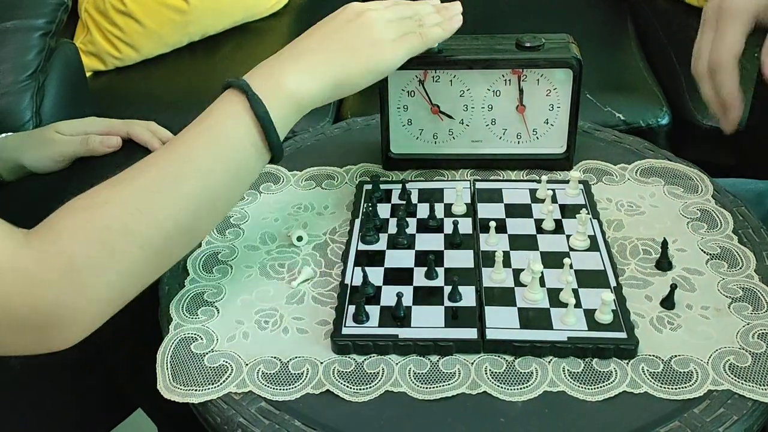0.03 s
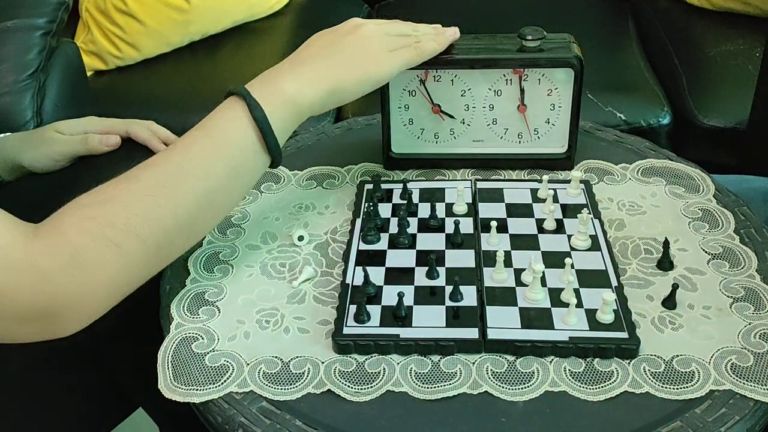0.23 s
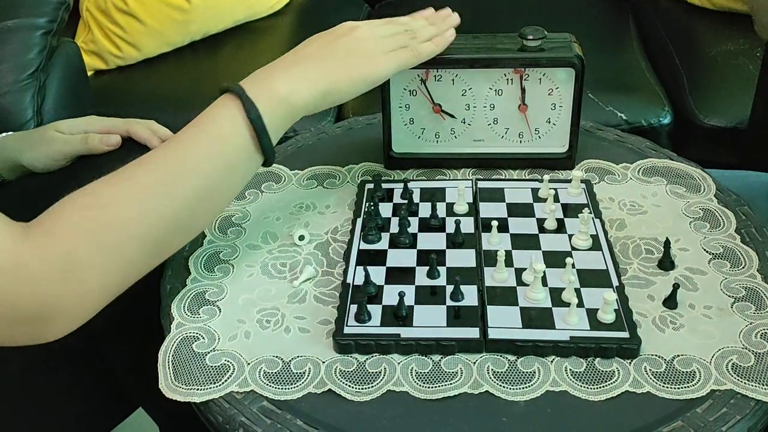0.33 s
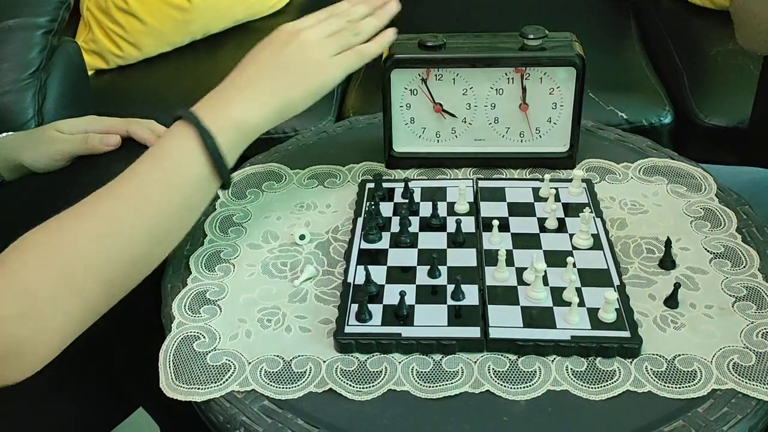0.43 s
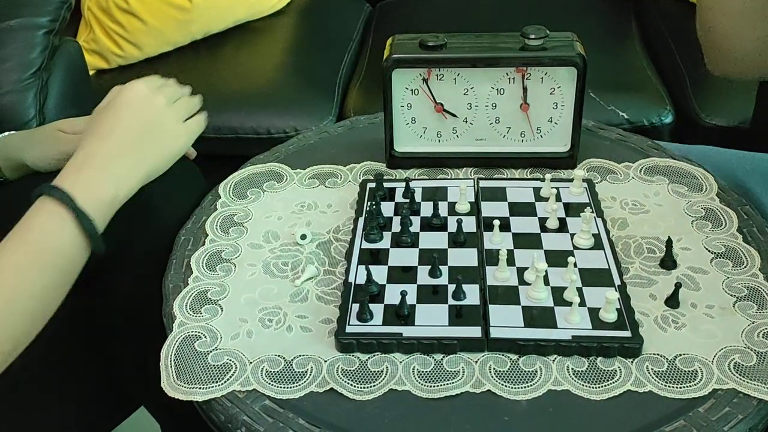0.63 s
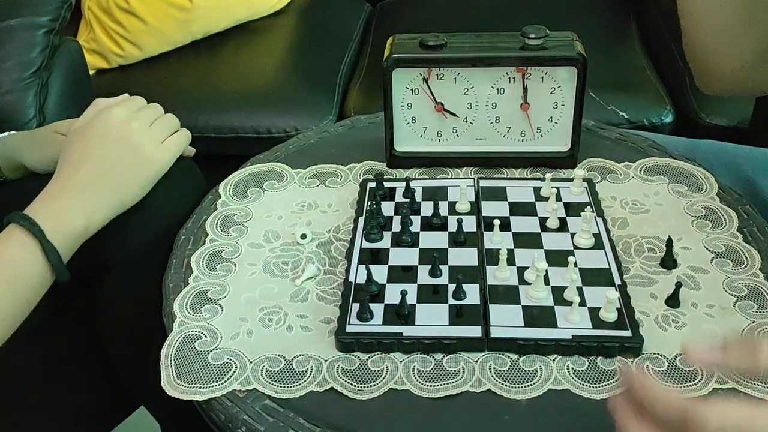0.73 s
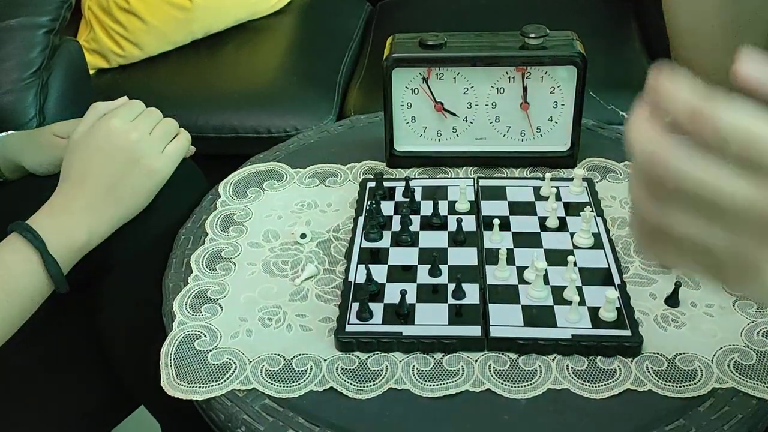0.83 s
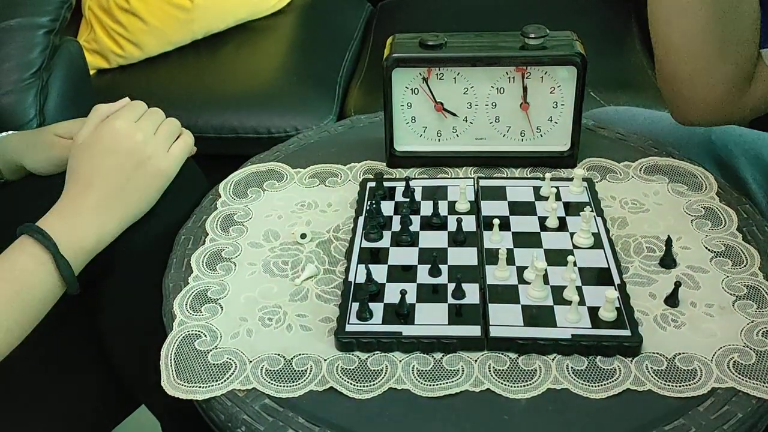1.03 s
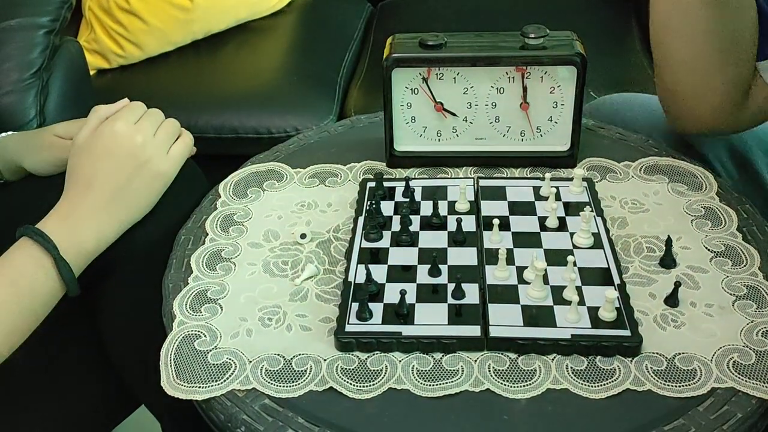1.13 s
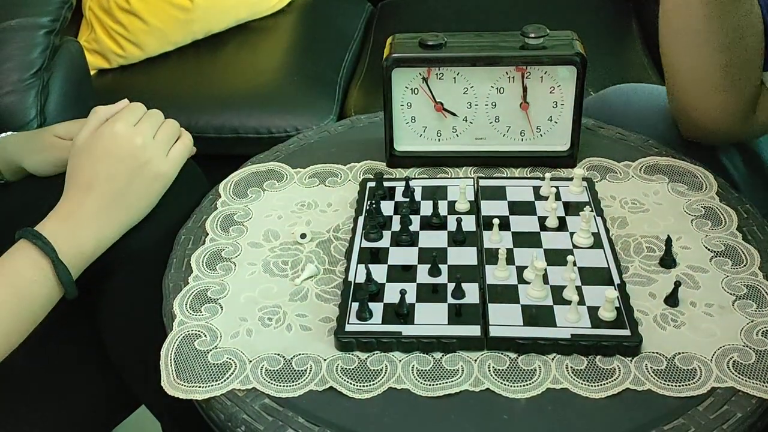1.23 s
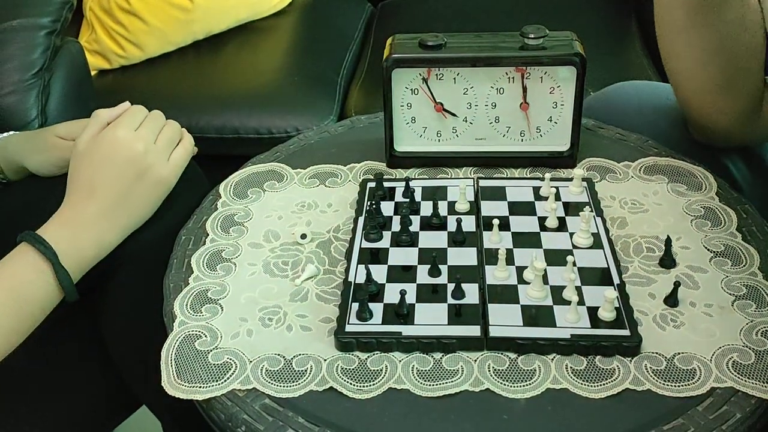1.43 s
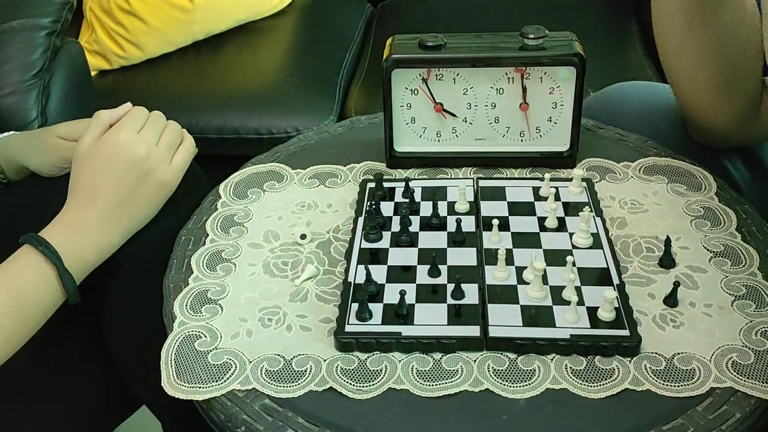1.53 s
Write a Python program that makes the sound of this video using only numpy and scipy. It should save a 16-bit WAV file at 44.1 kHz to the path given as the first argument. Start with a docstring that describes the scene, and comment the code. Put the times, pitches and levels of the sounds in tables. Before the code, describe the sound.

A mechanical chess clock button is pressed with a quick, hard double click that knocks the table, followed by a tiny scrape with ticks and soft thuds, close stereo microphone, small hissy room.

```python
"""Chess clock button on a table

Close on a mechanical chess clock in a small furnished room, through a microphone with two ports.
The plastic button rattles in twice, the second time hard: contacts ring case and works, shoves ring the table.
Later grains of friction and ticks, through broad resonances, make something small slide on the cloth;
decaying low tones make soft thuds through the table. Shaped noise makes the steady hiss, a low rustle
that comes and goes, and the decaying answer of the room."""
import sys
import numpy as np
from scipy import signal
from scipy.fft import rfft, irfft, next_fast_len
from scipy.io import wavfile
from scipy.ndimage import uniform_filter1d

SR = 44100
rng = np.random.default_rng(int(sys.argv[2]) if len(sys.argv) > 2 else 0)


def invert_db(x):
    """Field ratio 10**(x/20) for x, a level in decibels (scalar or array-like)."""
    u = np.asarray(x, float) / 20
    return 10 ** u


def dump(signal):
    """Clip the signal to [-1, 1] and save it as 16-bit WAV at the path in sys.argv[1]."""
    limited = np.clip(np.atleast_2d(signal).T, -1, 1)
    pcm = np.round(limited * 32767).astype(np.int16)
    wavfile.write(sys.argv[1], SR, pcm)


N = 70560  # samples, 1.6 s

# Levels of single sounds are those at the source, ahead of panning and low cut; colours are relative.
# steady hiss: (frequency [Hz], density [dB per Hz])
HISS_COLOUR = [(15, -50), (30, -12), (55, -4), (90, -10.5), (190, -5.5), (300, -8), (600, -9), (1200, -6),
               (1700, -5), (2250, -1.5), (2700, -6), (3150, -9.5), (4000, -9), (5400, -10.5), (6300, -17.5),
               (8000, -29.5), (12000, -34.5), (15000, -42), (16000, -55)]
# low rustle that comes and goes: (time [s], level [dB])
RUSTLE_LEVEL = [(0, -63.5), (.3, -48.5), (.7, -61), (.85, -49.5), (1.0, -64.5), (1.12, -53.5), (1.25, -50),
                (1.36, -55), (1.5, -50), (1.6, -50.5)]
# its colour: (frequency [Hz], density [dB per Hz])
RUSTLE_COLOUR = [(150, -13), (300, -12.5), (600, 1.5), (850, -4.5), (1400, -42.5)]
# left-right likeness of diffuse sound: (frequency [Hz], correlation [0-1])
ALIKE = [(30, .8), (120, 0.9), (400, 0.8), (1000, 0.23), (2500, 0), (6000, 0)]
# contacts of the button works: (time [s], drive of the low case [dB], drive of the bright works [dB])
CONTACTS = [(.2328, -19, -36), (0.2342, -20.5, -24.5), (.2362, -25, -26.5), (.2384, -13.5, -26.5),
            (0.2407, -21, -20), (.243, -42, -34), (0.2503, -33, -33), (.261, -31, -29.5),
            (0.28, -24.5, -32.5), (.283, -26, -32), (.285, -21, -53), (0.2859, -19.5, -20),
            (.2879, -17.5, -13.5), (0.2888, -13.5, -12.5), (0.2901, -10.5, -10.5), (0.2911, -13.5, -9.5),
            (0.2933, -24.5, -15), (0.2953, -33, -23.5), (0.2987, -31.5, -19), (.3012, -25, -27.5),
            (.304, -16, -20.5)]
# modes of the hollow case, before scatter: (frequency [Hz], level [dB], t60 [s])
CASE_MODES = [(679, -2, 0.03), (835, -4.5, 0.027), (974, 5, 0.011), (1105, -7, 0.021), (1270, -2, 0.016)]
# modes of lever and button, before scatter: (frequency [Hz], level [dB], t60 [s])
WORKS_MODES = [(1665, 2.5, 0.013), (2060, 0.5, 0.027), (2130, -23, 0.025), (2270, 6, 0.0079),
               (3200, -19, 0.0058), (3960, -1.5, .012), (4316, 8, 0.01), (5075, 0, 0.027),
               (5600, -27, 0.0059), (7240, -7, 0.017), (12400, -22, 0.012)]
# colour of the crack of a contact: (frequency [Hz], density [dB per Hz])
CRACK_COLOUR = [(300, -45), (1200, -9.5), (5500, 6.5), (7000, -12.5), (12000, -12.5), (15000, -24)]
# shoves that the presses give the table: (time [s], level [dB])
SHOVES = [(.2355, -26), (0.2874, -14.5), (0.321, -27.5), (0.348, -32.5)]
# modes of the table, before scatter: (frequency [Hz], level [dB], t60 [s])
TABLE_MODES = [(92, -25, 0.3), (144, 4.5, 0.06), (249, 1.5, 0.053), (563, -3, 0.1), (1108.6, -13.5, 0.13)]
# decay of the room: (frequency [Hz], t60 [s])
ROOM_DECAY = [(100, 0.47), (500, 0.38), (2000, 0.53), (5000, 0.46), (10000, 0.57)]
# colour of the room's answer: (frequency [Hz], level [dB])
ROOM_COLOUR = [(100, -8), (250, -1), (600, -3.5), (1100, 1), (2100, -5.5), (3000, 5.5), (4300, -2),
               (6500, 1.5), (12000, -5.5)]
# the slide on the cloth: (time [s], level [dB])
SLIDE = [(.79, -66), (.822, -50), (.832, -41), (.84, -42), (.846, -38), (.853, -41), (.862, -44),
         (.875, -45), (.89, -49), (.93, -66)]
# small ticks: (time [s], peak level [dB])
TICKS = [(.8432, -30), (.8452, -29), (.8512, -23)]
# what slides and ticks rings with: (frequency [Hz], width [Hz], level [dB])
PIECE_MODES = [(1640, 370, 6), (2040, 390, 6.5), (3360, 350, -2.5), (3700, 380, 0.5), (5100, 300, -1.5),
               (7600, 460, -17), (14400, 4500, -24.5)]
# soft thuds: (time [s], level [dB], frequency [Hz], t60 [s])
THUDS = [(.8, -36.5, 224, 0.073), (.8, -35, 470, 0.052), (.81, -36.5, 80, 0.22), (0.85, -32.5, 174, 0.05),
         (0.864, -33.5, 73.9, 0.25), (0.901, -41, 73.1, 0.16), (1.072, -36.5, 192, 0.044),
         (1.2, -41, 105, 0.16), (1.268, -39, 354, 0.085), (1.284, -37, 84, 0.18), (1.32, -39, 181, 0.078)]

HISS_DB = -43.5
PORT_LAG_S = 0.0002  # left port later than right, diffuse sound
CASE_RISE_S, CASE_SCATTER_DB, CASE_DETUNE = 0.0003, 1.5, 0.02  # detuning as a fraction of frequency
WORKS_RISE_S, WORKS_SCATTER_DB, WORKS_DETUNE = 0.00015, 1.5, 0.06
OWN_SHARE = 0.94  # part of the bright ringing's power that each port hears on its own
WORKS_PAN_DB, WORKS_LAG_S = -0.3, 0.00008  # added left, taken off right; left later
CRACK_DB, CRACK_T60_S = 3.5, 0.0055  # above the works drive, before colouring
SHOVE_RISE_S, SHOVE_SCATTER_DB = 0.004, 0.76
ROOM_DB, ROOM_DELAY_S = -4.5, 0.004
SLIDE_GRAINS_PER_S, SLIDE_PAN_DB = 2600, -4  # added left, taken off right
THUD_RISE_S = 0.0036
LOW_CUT_HZ, TOP_HZ = 68, 15800
SQUASH_TOP, SQUASH_HARD = 0.9, 4  # ceiling at full scale 1; sharpness of the bend


def unit(x):
    """Scale to rms 1."""
    return x / np.sqrt(np.mean(x ** 2) + 1e-20)


def along(points, hz):
    """Read (frequency, value) points on a log frequency axis."""
    f, value = np.transpose(points)
    return np.interp(np.log(hz + 1), np.log(f + 1), value)


def level(rows):
    """Gain per sample from (time, dB) rows."""
    s, db = np.transpose(rows)
    return invert_db(np.interp(np.arange(N) / SR, s, db))


def filtered(x, response):
    """Multiply the spectrum of x by a complex response of frequency."""
    m = next_fast_len(N + SR // 2)
    return irfft(rfft(x, m) * response(np.fft.rfftfreq(m, 1 / SR)), m)[..., :N]


def lagged(pair, lag_s):
    """Left later than right by lag_s, half of it on each side."""
    side = np.array([[1], [-1]])
    return filtered(pair, lambda hz: np.exp(-1j * np.pi * hz * side * lag_s))


def diffuse(pair, colour):
    """Mix two unrelated signals into a coloured pair with the likeness of two close ports."""
    def mid_side(hz):
        angle = np.arccos(np.clip(along(ALIKE, hz), -1, 1)) / 2
        return invert_db(along(colour, hz)) * [np.cos(angle), np.sin(angle)]
    mid, side = filtered(pair, mid_side)
    return lagged(np.array([mid + side, mid - side]), PORT_LAG_S)


def rush(colour, patchy_db):
    """Stereo noise of rms 1, its gain varied at random over time and frequency."""
    z = signal.stft(rng.standard_normal((2, N)), nperseg=512)[2]
    field = uniform_filter1d(rng.standard_normal(z.shape[1:]), size=5, axis=0)
    field = unit(uniform_filter1d(field, size=10, axis=1))
    noise = signal.istft(z * invert_db(patchy_db * field), nperseg=512)[1][:, :N]
    return unit(diffuse(noise, colour))


def ring(modes, start_s, scatter_db, rise_s, detune=0):
    """Damped modes with random strength and detuning, up to half a second; also their time axis."""
    t = np.clip(np.arange(N) / SR - start_s, 0, None)
    t = t[round(start_s * SR):][:SR // 2]
    hz, db, t60 = np.transpose(modes)[..., None]
    strength, shift = rng.standard_normal((2, *hz.shape))
    decay = invert_db(db + scatter_db * strength - 60 * t / t60)
    x = decay * np.sin(2 * np.pi * hz * (1 + detune * shift) * t)
    return x.sum(axis=0) * (1 - np.exp(-t / rise_s)), t


def add(x, s, y):
    """Mix y into x at time s."""
    x[..., round(s * SR):][..., :y.shape[-1]] += y


def hiss():
    """Steady room hiss: diffuse coloured noise at one level."""
    return invert_db(HISS_DB) * rush(HISS_COLOUR, patchy_db=1.5)


def rustle():
    """Low rustle: diffuse coloured noise that swells and sinks."""
    return level(RUSTLE_LEVEL) * rush(RUSTLE_COLOUR, patchy_db=1)


def button():
    """Each contact rings the case alike in both ports, the works partly apart, with a noisy crack."""
    case, works, cracks = np.zeros(N), np.zeros((2, N)), np.zeros((2, N))
    for s, case_db, works_db in CONTACTS:
        thump, _ = ring(CASE_MODES, s, CASE_SCATTER_DB, CASE_RISE_S, CASE_DETUNE)
        add(case, s, invert_db(case_db) * thump / 2)
        (both, t), (left, _), (right, _) = [
            ring(WORKS_MODES, s, WORKS_SCATTER_DB, WORKS_RISE_S, WORKS_DETUNE) for _ in range(3)]
        bright = np.sqrt(1 - OWN_SHARE) * both + np.sqrt(OWN_SHARE) * np.array([left, right])
        add(works, s, invert_db(works_db) * bright / 2)
        crack_level = invert_db(works_db + CRACK_DB - 60 * t / CRACK_T60_S)
        add(cracks, s, crack_level * rng.standard_normal((2, len(t))))
    works = works + filtered(cracks, lambda hz: invert_db(along(CRACK_COLOUR, hz)))
    return case + lagged(works * invert_db([[WORKS_PAN_DB], [-WORKS_PAN_DB]]), WORKS_LAG_S)


def table():
    """Each shove rings the damped modes of the table, alike in both ports."""
    x = np.zeros(N)
    for s, db in SHOVES:
        add(x, s, invert_db(db) * ring(TABLE_MODES, s, SHOVE_SCATTER_DB, SHOVE_RISE_S)[0])
    return x


def room(x):
    """The room's answer: a noise tail in which each frequency dies at its own speed."""
    hz, t, z = signal.stft(rng.standard_normal((2, SR * 3 // 4)), SR, nperseg=256)
    decay = invert_db(-60 * t / along(ROOM_DECAY, hz)[:, None])
    tail = signal.istft(z * decay, SR, nperseg=256)[1]
    tail = tail / np.linalg.norm(tail[0])
    tail = np.pad(tail, ((0, 0), (round(ROOM_DELAY_S * SR), 0)))
    return diffuse(signal.fftconvolve(x[None], tail, axes=1)[:, :N], ROOM_COLOUR)


def piece():
    """Uneven grains of friction and a few ticks excite the broad resonances of something small."""
    def body(f):
        total = 0
        for k, (centre, width, db) in enumerate(PIECE_MODES):
            damping = 1j * f * width
            total = total + (-1) ** k * invert_db(db) * damping / (centre ** 2 - f ** 2 + damping)
        return total
    struck = rng.random((2, N)) < SLIDE_GRAINS_PER_S / SR
    grains = struck * rng.standard_normal((2, N))
    # the first grains reach both ports, the second only the right
    slide = unit(filtered(grains[0] + grains, body)) * level(SLIDE)
    blows = np.zeros(N)
    for s, db in TICKS:
        blows[round(s * SR)] = invert_db(db)
    one_tick = filtered(np.arange(N) == 0, body)
    ticks = filtered(blows, body) / np.abs(one_tick).max()
    return (slide + ticks) * invert_db([[SLIDE_PAN_DB], [-SLIDE_PAN_DB]])


def thuds():
    """Soft knocks through the table: low damped tones with a slow rise."""
    x = np.zeros(N)
    for s, db, hz, t60 in THUDS:
        add(x, s, ring([(hz, db, t60)], s, 0, THUD_RISE_S)[0])
    return x


def scene():
    """Close table sounds after a low cut, the room's answer to them, hiss and rustle."""
    steady = hiss() + rustle()
    near = button() + table() + piece() + thuds()
    # three equal first-order low cuts
    near = filtered(near, lambda hz: (1j * hz / (1j * hz + LOW_CUT_HZ)) ** 3)
    return near + invert_db(ROOM_DB) * room(near.mean(axis=0)) + steady


def band_limit(x):
    """A steep low-pass at the top of the band."""
    return signal.sosfilt(signal.butter(12, 16500, fs=SR, output="sos"), x)


def record(dry):
    """The input stage rounds off the highest peaks, then the band is limited."""
    soft = dry / (1 + np.abs(dry / SQUASH_TOP) ** SQUASH_HARD) ** (1 / SQUASH_HARD)
    mix = filtered(soft, lambda hz: hz < TOP_HZ)
    return band_limit(mix)


dry = scene()
out = record(dry)
dump(out)
```